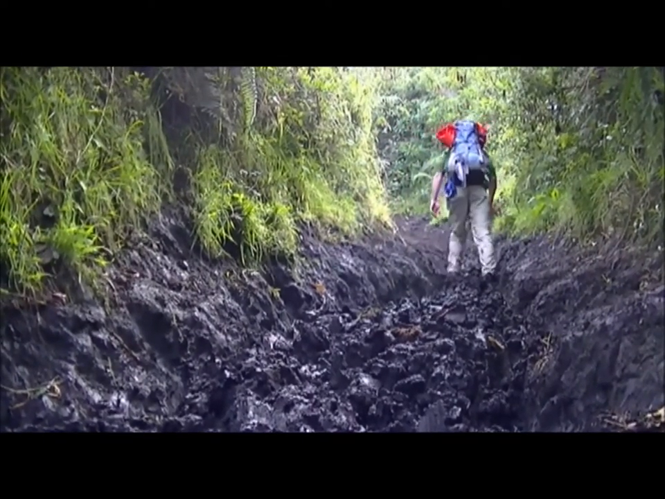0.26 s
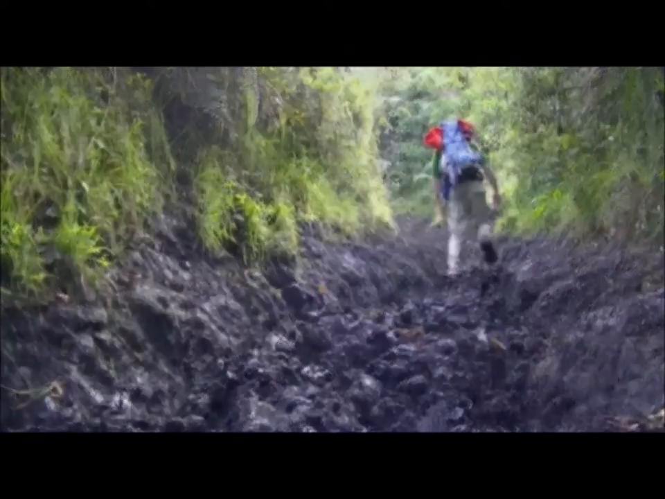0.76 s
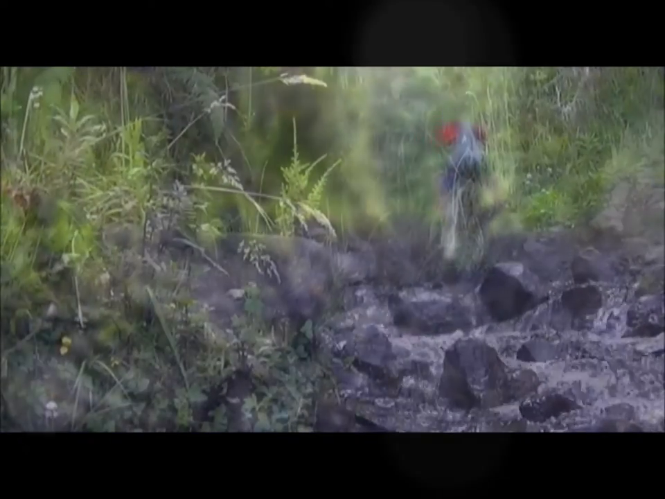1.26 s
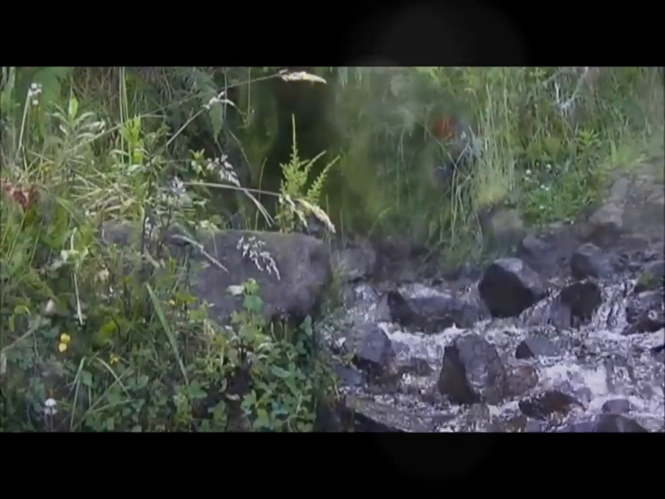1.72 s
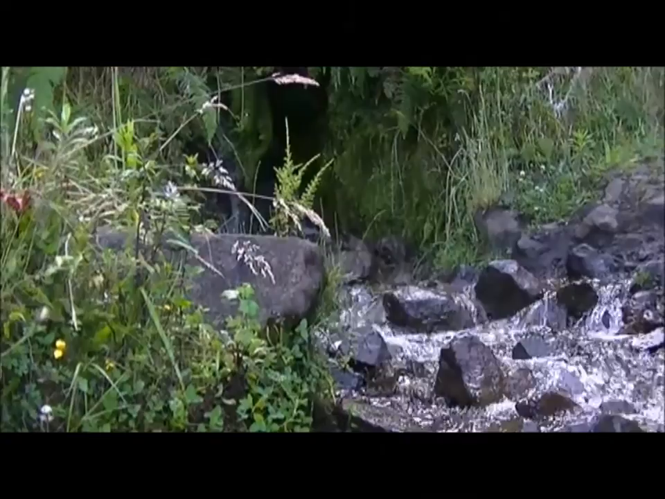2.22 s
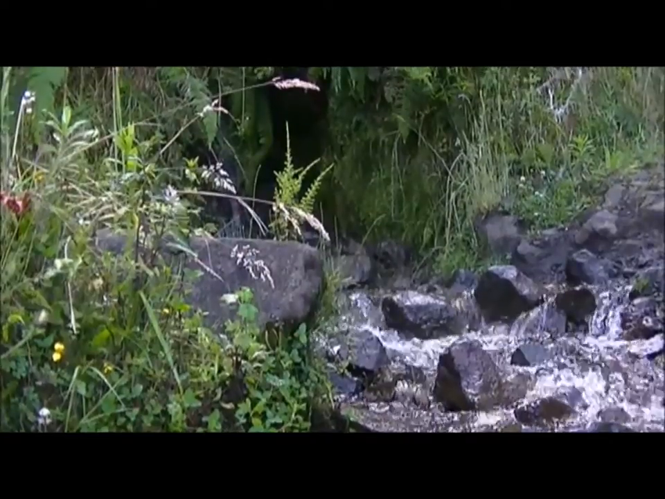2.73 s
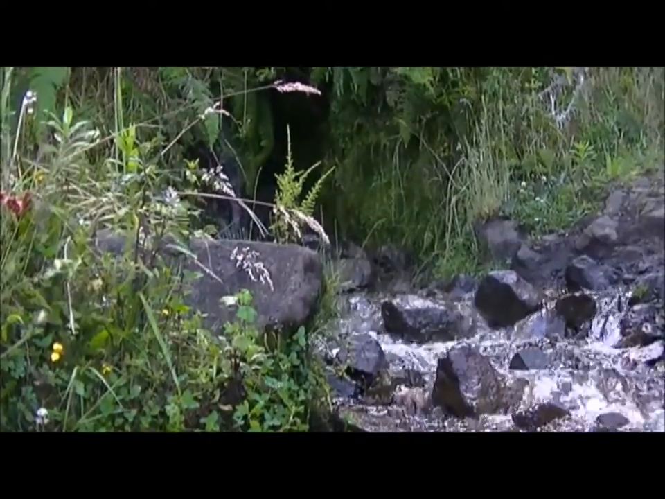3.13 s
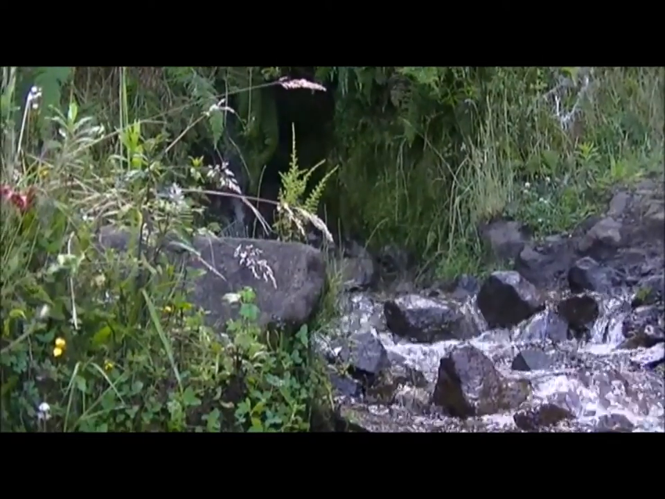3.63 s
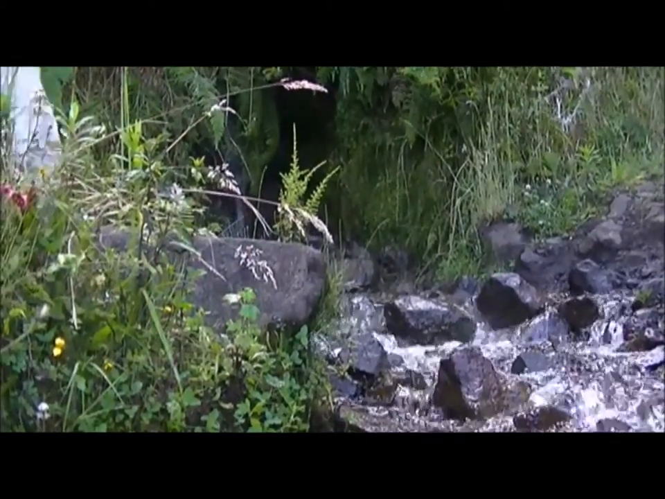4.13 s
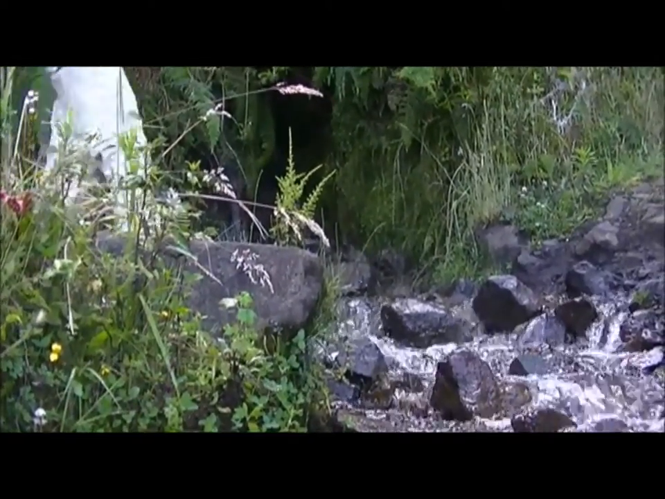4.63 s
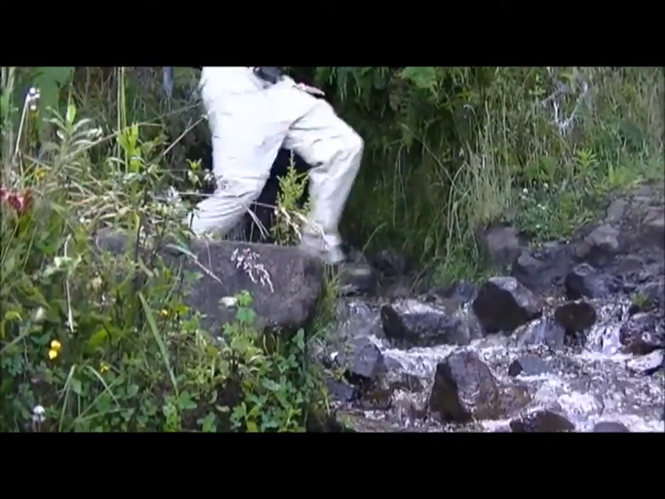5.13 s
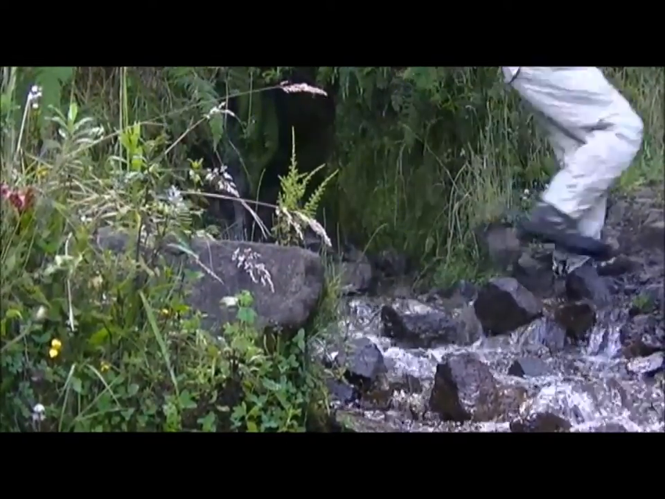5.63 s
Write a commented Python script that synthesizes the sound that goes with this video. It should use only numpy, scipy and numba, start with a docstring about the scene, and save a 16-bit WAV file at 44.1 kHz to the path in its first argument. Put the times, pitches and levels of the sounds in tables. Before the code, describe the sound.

Faint forest air, then after a second a close mountain stream starts abruptly, rushing and gurgling loudly over rocks.

```python
"""A faint, wide hiss of forest air with a far rustle and drip.
After one second a small mountain stream starts abruptly, close and loud.
Its rush, countless tiny bubbles, is flickering bands of noise. Nearer bubbles
pop, gurgle and gulp out of it, each a short ring that rises in pitch as it nears the surface."""
import sys
import numpy as np
from scipy import signal
from scipy.fft import rfft, irfft
from scipy.io import wavfile
from numba import njit

SR = 44100
rng = np.random.default_rng(int(sys.argv[2]) if len(sys.argv) > 2 else 0)


def dump_mix(stems):
    """Bounce the given channels to the path in sys.argv[1] as a 16-bit WAV at rate SR."""
    frames = np.atleast_2d(stems).T  # one column per channel
    limited = np.clip(frames, -1, 1)  # hard clip at full scale
    pcm = np.round(limited * 32767).astype(np.int16)
    wavfile.write(sys.argv[1], SR, pcm)


N = 258426


def from_db(db):
    """Gain of a level in dB."""
    return 10 ** (np.asarray(db) / 20)


def rms_one(x):
    """Scale to unit rms."""
    return x / np.sqrt(np.mean(x ** 2) + 1e-20)


def at_hz(curve, hz):
    """Read a curve on a log-frequency axis."""
    curve_hz, curve_db = np.array(curve).T
    return np.interp(np.log(hz), np.log(curve_hz), curve_db)


def drift(rate_hz):
    """Slow random wander, rms about 1: low-passed noise drawn every 20th sample."""
    pole = np.exp(-40 * np.pi * rate_hz / SR)
    noise = rng.standard_normal(N // 20 + 4002)
    slow = signal.lfilter([1], [1, -2 * pole, pole * pole], noise)[4000:]
    return np.interp(np.arange(N) / 20, np.arange(len(slow)), rms_one(slow))


def patchy_noise(spectrum, width, balance, surge_db, flicker_db):
    """Half-octave bands of stereo noise that surge together and flicker band by band; rms 1."""
    hz = np.maximum(np.fft.rfftfreq(N, 1 / SR), 10)
    mid, side = rfft(rng.standard_normal((2, N))) * from_db(at_hz(spectrum, hz))
    side = side * from_db(at_hz(width, hz))
    pair = np.array([mid + side, mid - side]) * from_db(np.outer([.5, -.5], at_hz(balance, hz)))
    out, surge, lower_flicker = 0, drift(5.6), drift(25.0)
    for octave in np.arange(3, 14.6, .5):
        band = np.cos(np.pi * np.clip(np.log2(hz) - octave, -.5, .5)) ** 2   # neighbours sum to one
        upper_flicker = drift(30.0)
        level_db = surge_db * surge + flicker_db * (lower_flicker + upper_flicker)
        out = out + from_db(level_db) * irfft(pair * band, N)
        lower_flicker = upper_flicker
    return rms_one(out)


@njit
def add_rings(out, start_s, peak, hz, cycles, rise, lag_s, pan):
    """Each bubble swells, rises in pitch as it nears the surface and dies; steep risers peak late."""
    for k in range(len(start_s)):
        life_samples = cycles[k] / hz[k] * SR
        first = int(start_s[k] * SR)
        swell = .08 + .6 * rise[k] ** 2   # share of life spent growing
        decay = 1 + 2 * rise[k] ** 2
        for ear in range(2):
            side = 2 * ear - 1
            shift = start_s[k] * SR - first + side * lag_s[k] * SR
            gain = peak[k] * (1 + side * pan[k])
            for i in range(min(int(2.5 * life_samples), out.shape[1] - first)):
                age = (i - shift) / life_samples
                pitch_hz = hz[k] * (1 + .7 * rise[k] * age)
                if age > 0 and pitch_hz < .45 * SR:
                    phase = 2 * np.pi * cycles[k] * (age + .35 * rise[k] * age * age)
                    envelope = age / swell if age < swell else 10. ** ((swell - age) * decay)
                    out[ear, first + i] += gain * envelope * np.sin(phase)


def bubbles(rows, lag_spread_s=5e-6, pan_spread=0.035):
    """Ringing bubbles; each one's place gives a small lag and tilt between the ears."""
    start_s, peak_db, hz, cycles, rise = np.array(rows, float).T.copy()
    lag, pan, polarity = rng.standard_normal((len(start_s), 3)).T
    out = np.full((2, N), 1e-18)
    add_rings(out, start_s, from_db(peak_db) * np.sign(polarity), hz, np.maximum(cycles, 1),
              np.maximum(rise, 0), lag_spread_s * lag, pan_spread * pan)
    low_cut = signal.butter(4, 260, "high", fs=SR, output="sos")   # the bubbles are heard without their deep bass
    return signal.sosfilt(low_cut, out)


# Air spectrum. Each row: frequency in Hz, relative density in dB.
AIR_SPECTRUM = [(24, -60), (40, -33), (312, -5.5), (715, -2.5), (896, -4.5), (1180, -4.5), (1370, -5),
                (1810, -5.5), (4460, -8), (14500, -15.5), (16000, -30)]
# Air stereo width. Each row: frequency in Hz, side minus mid in dB.
AIR_WIDTH = [(60, -3), (110, -3), (200, -4), (380, -3), (700, -2), (1290, -3), (2380, -5), (4400, -7),
             (8120, -12), (15000, -37)]


def forest_air(level_db=-57):
    """A wide, centred, nearly steady hiss."""
    balance = [(100, 0), (9000, 0)]
    return from_db(level_db) * patchy_noise(AIR_SPECTRUM, AIR_WIDTH, balance, surge_db=0.5, flicker_db=0.4)


def rustle(middle_s=.84, spread_s=.06, level_db=-68, band_hz=(3500, 5600)):
    """A far rustle: one soft swell of uneven hiss."""
    band = signal.butter(2, band_hz, "band", fs=SR, output="sos")
    hiss = signal.sosfilt(band, rng.standard_normal((2, N)))
    swell = np.exp(-.5 * ((np.arange(N) / SR - middle_s) / spread_s) ** 2)
    return from_db(level_db + 3.0 * drift(25.0)) * swell * rms_one(hiss + .6 * hiss[::-1])


# Far drip. Each row: start in seconds, peak in dB, pitch in Hz, life in cycles, pitch rise factor.
DRIP = [(0.905, -47, 4600, 13, 0.1)]


def drip():
    """A far drip rings as one faint bubble."""
    return bubbles(DRIP)


# Rush spectrum. Each row: frequency in Hz, relative density in dB.
RUSH_SPECTRUM = [(35, -77), (60, -47), (212, -15.5), (323, -14), (408, -4), (480, -2.5), (1090, 0),
                 (1860, -1.5), (2050, -3), (4220, -8), (7060, -14), (11000, -21.5), (14900, -36),
                 (16000, -37)]
# Rush stereo width. Each row: frequency in Hz, side minus mid in dB.
RUSH_WIDTH = [(60, -17), (110, -34), (200, -48), (380, -35), (700, -27.5), (1290, -43.5), (2380, -36.5),
              (4400, -33), (8120, -12), (15000, -25)]
# Rush balance. Each row: frequency in Hz, left minus right in dB.
RUSH_BALANCE = [(60, 0.0), (110, 0.5), (200, -0.5), (380, -0.5), (700, 0.0), (1290, -0.5), (2380, 0.0),
                (4400, -0.5), (8120, -1.5), (15000, -1)]


def rush(level_db=-16.5):
    """Countless tiny bubbles merge into dense noise."""
    noise = patchy_noise(RUSH_SPECTRUM, RUSH_WIDTH, RUSH_BALANCE, surge_db=0.15, flicker_db=0.62)
    return from_db(level_db) * noise


# Spectrum of the nearer bubbles. Each row: frequency in Hz, relative density in dB.
FROTH_SPECTRUM = [(180, -32), (300, -18.5), (486, -1), (1850, 0), (7240, -13), (9670, -17.5), (14000, -66)]


def froth(level_db, count, clump_db, size_db, min_cycles, max_rise):
    """Nearer bubbles, born in clumps as water slops over stones, spread evenly in log pitch."""
    time_draw, pitch_draw, size_draw, life_draw, rise_draw = rng.random((count, 5)).T
    births = np.cumsum(from_db(clump_db * drift(30.0) + 2.0 * drift(5.0)))
    start_s = np.interp(time_draw, births / births[-1], np.arange(N) / SR)
    low_hz, high_hz = FROTH_SPECTRUM[0][0], FROTH_SPECTRUM[-1][0]
    hz = low_hz * (high_hz / low_hz) ** pitch_draw
    boost_db = size_db * np.minimum(-np.log(1 - size_draw), 3.2)   # many small, few large
    peak_db = at_hz(FROTH_SPECTRUM, hz) + 20 * np.log10(hz) + boost_db
    cycles = min_cycles * 2.5 ** life_draw
    rings = bubbles(np.c_[start_s, peak_db, hz, cycles, max_rise * rise_draw])
    return from_db(level_db) * rms_one(rings)


# Loudest single bubbles. Each row: start in seconds, peak in dB, pitch in Hz.
POPS = [(1.027, -8, 1970), (1.2734, -6, 2260), (1.3071, -10, 6240), (1.3297, -7, 7880), (1.3516, -4, 3630),
        (1.3584, -5, 5070), (1.3628, -7, 4410), (1.379, -5, 4200), (1.382, -8, 2580), (1.4479, -10, 3650),
        (1.55, -3, 3400), (1.5672, -8, 7450), (1.5691, -11, 4940), (1.72, -2.5, 3250), (1.8628, -7, 6230),
        (1.8643, -7, 1730), (1.8947, -5, 2490), (1.9119, -7, 4750), (1.938, -4, 6760), (2.0058, 1, 8290),
        (2.011, -13, 1200), (2.0691, -8, 6900), (2.0817, -10.5, 850), (2.1263, -9, 880), (2.1707, -7, 4500),
        (2.2623, -6, 2610), (2.2932, -8, 995), (2.3462, -5, 4580), (2.4619, -3, 5180), (2.4799, -7, 4200),
        (2.6164, -9, 2360), (2.7163, -5, 2460), (2.8096, -6, 3370), (3.0256, -7, 1900), (3.1411, -8, 3750),
        (3.1554, -13, 720), (3.1967, -5, 4480), (3.2124, -7, 4140), (3.2327, -6, 4110), (3.3027, -7, 3750),
        (3.3619, -7, 3350), (3.4153, -15, 470), (3.4948, -3, 7410), (3.5259, -4, 4100), (3.531, -6, 6150),
        (3.5722, -7, 2160), (3.777, -6, 2200), (3.8574, -5, 2150), (3.9135, -8, 1330), (3.93, -1.5, 4400),
        (4.0305, -7, 3720), (4.057, -6, 1430), (4.0755, 5, 4300), (4.0802, 1, 4070), (4.1147, -8, 1040),
        (4.127, -6, 1450), (4.131, -5.5, 1330), (4.1364, -10, 1240), (4.1415, -2, 7500), (4.2036, -9, 790),
        (4.281, -2, 2500), (4.6432, -7, 3200), (4.799, -11, 7250), (4.8078, 2, 5240), (4.9457, -6, 3830),
        (5.0769, -7, 2840), (5.098, -6, 2750), (5.1896, -9, 5000), (5.2184, -6, 3320), (5.2273, -4, 4170),
        (5.26, -3, 3000), (5.3121, -8.5, 865), (5.3884, -3, 2770), (5.4513, 0, 3400), (5.5147, -9, 8200),
        (5.5201, -6, 4100), (5.568, -8, 8890), (5.6179, -5, 5800), (5.6185, -8, 1120), (5.624, -5, 2690),
        (5.699, -6, 1930), (5.8392, 2, 4900)]


def pops(base_cycles=5.7, cycles_per_db=-0.46, cycles_per_octave=-0.88, rise=0.1):
    """Single bubbles burst out; harder and smaller ones ring fewer cycles."""
    rows = []
    for start_s, peak_db, hz in POPS:
        cycles = base_cycles + cycles_per_db * peak_db + cycles_per_octave * np.log2(hz / 3000)
        rows.append((start_s, peak_db, hz, cycles, rise))
    return bubbles(rows)


# Deep gulps. Each row: start in seconds, peak in dB, starting pitch in Hz.
GULPS = [(1.595, -8.5, 528), (2.152, -10.5, 639)]


def gulps(cycles=10.3, rise=1.1):
    """Deep bubbles swell slowly and slide steeply upward."""
    return bubbles([(start_s, peak_db, hz, cycles, rise) for start_s, peak_db, hz in GULPS])


def scene(stream_start_s=1.0215, crossfade_s=0.00073):
    """Forest air gives way to the stream within a millisecond."""
    stream_on = np.clip((np.arange(N) / SR - stream_start_s) / crossfade_s, 0, 1)
    flow = rush()
    fizz = froth(level_db=-22, count=14000, clump_db=4.0, size_db=3.5, min_cycles=2.83, max_rise=0.41)
    gurgle = froth(level_db=-27, count=1500, clump_db=3.0, size_db=2.5, min_cycles=8.23, max_rise=0.845)
    air = forest_air()
    stream = flow + fizz + gurgle + pops() + gulps()
    return stream_on * stream + (1 - stream_on) * (air + rustle()) + drip()


def record(dry, narrow_hz=12000, cutoff_hz=15750):
    """The highest treble narrows toward the centre; peaks clip at full scale and the top is cut."""
    mid, side = (dry[0] + dry[1]) / 2, (dry[0] - dry[1]) / 2
    side = signal.sosfiltfilt(signal.butter(3, narrow_hz, fs=SR, output="sos"), side)
    clipped = np.clip([mid + side, mid - side], -1, 1)
    return signal.sosfilt(signal.ellip(12, .3, 80, cutoff_hz, fs=SR, output="sos"), clipped)


dry = scene()
out = record(dry)
dump_mix(out)
```